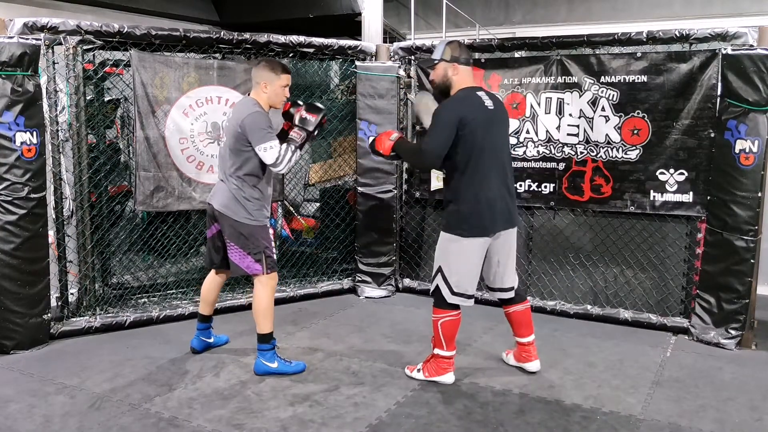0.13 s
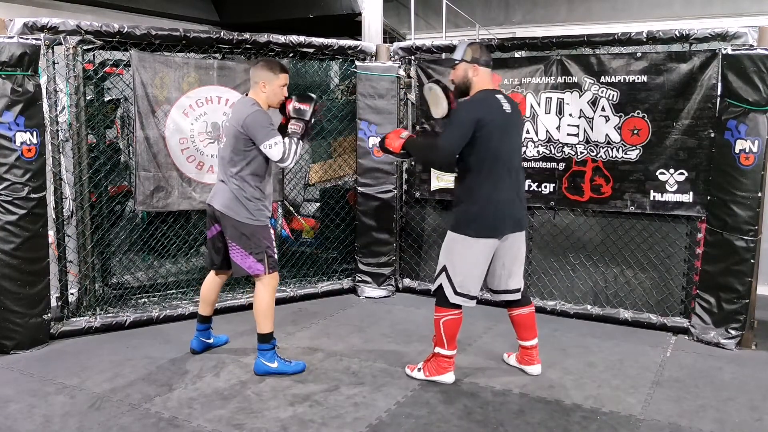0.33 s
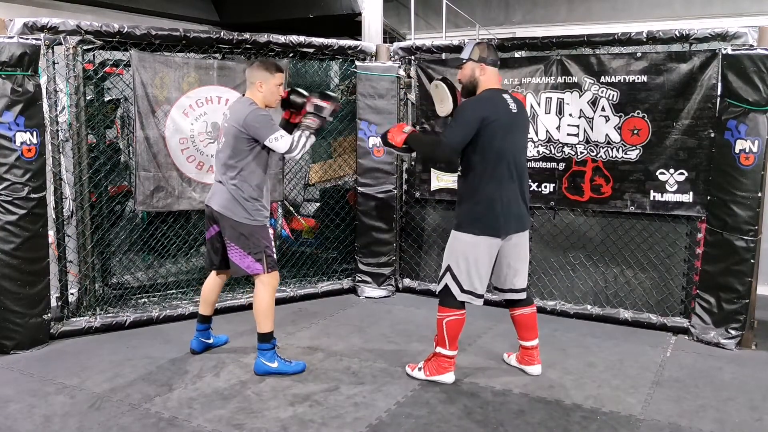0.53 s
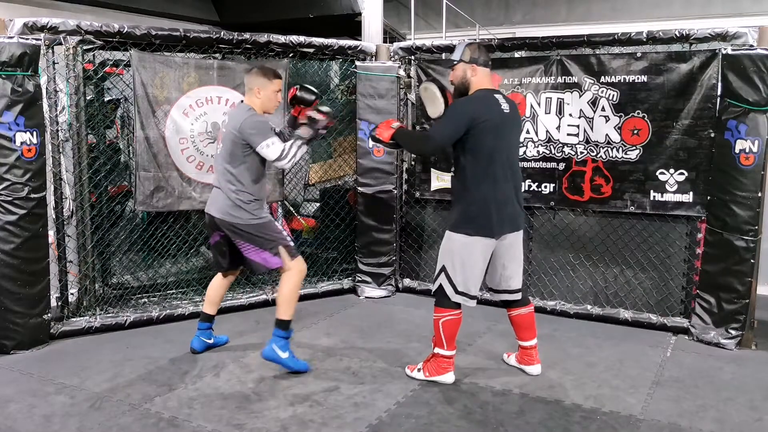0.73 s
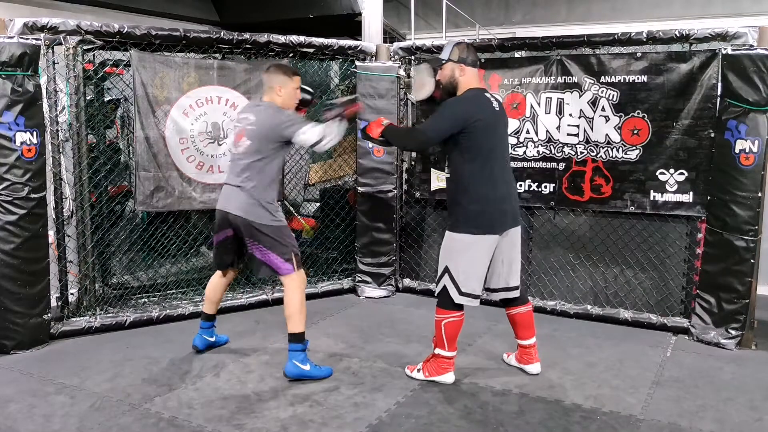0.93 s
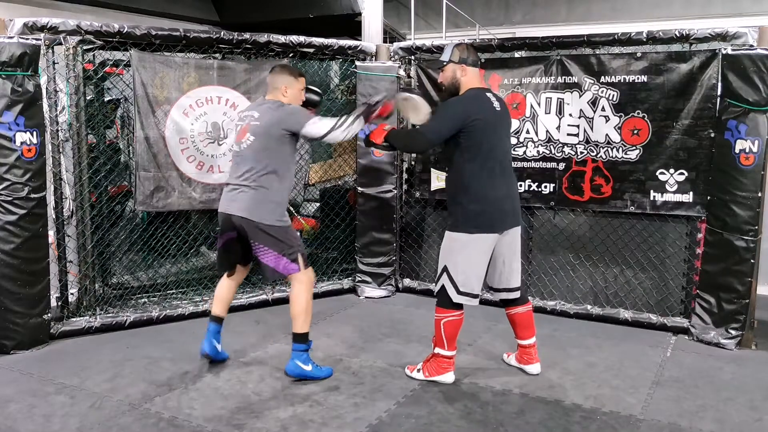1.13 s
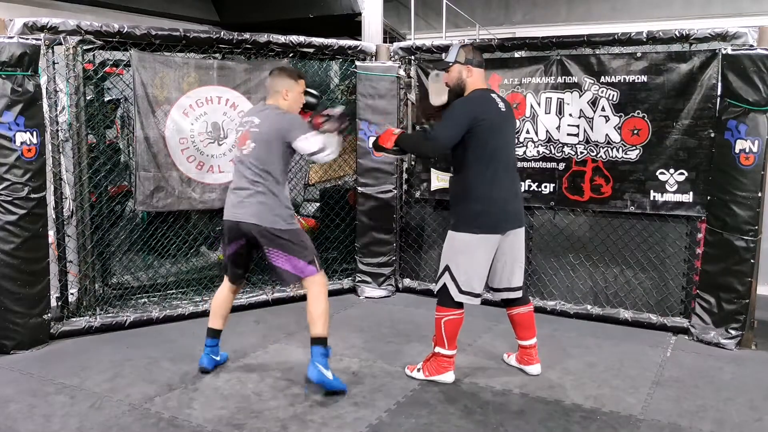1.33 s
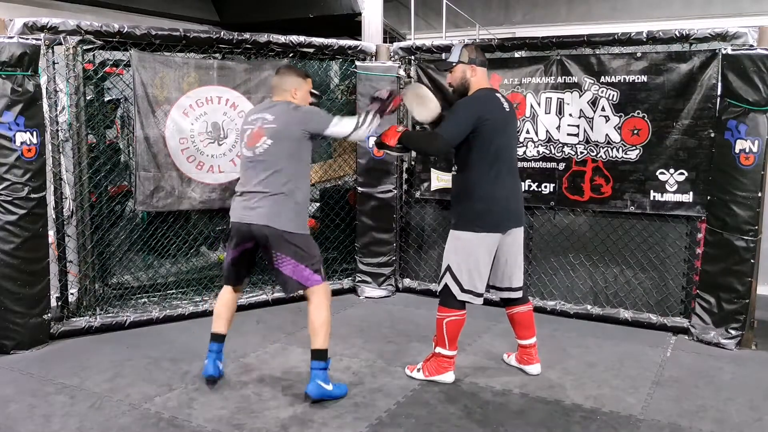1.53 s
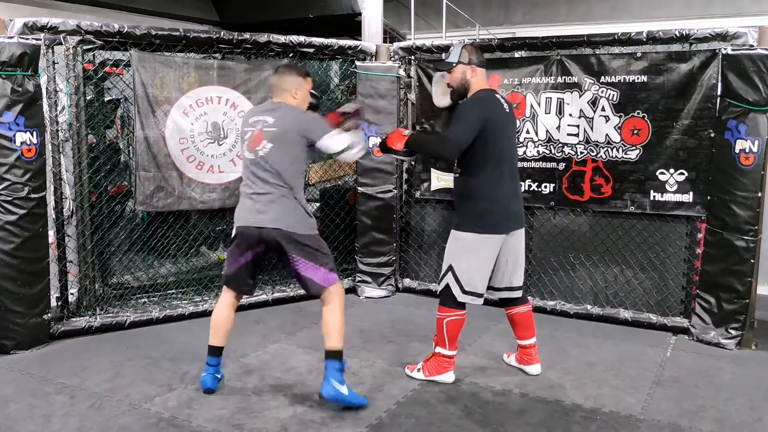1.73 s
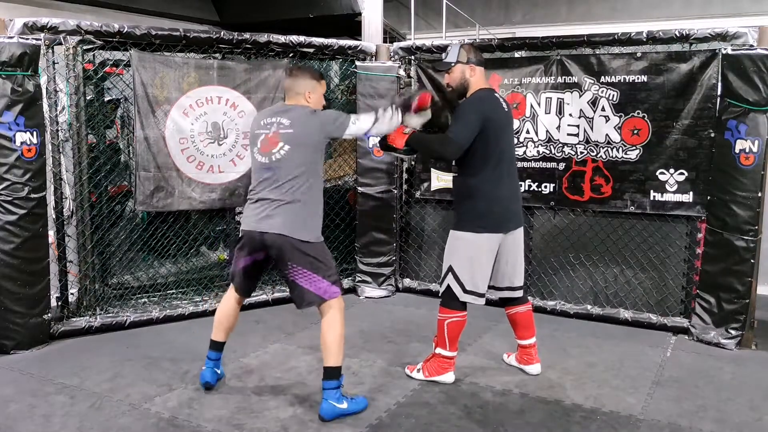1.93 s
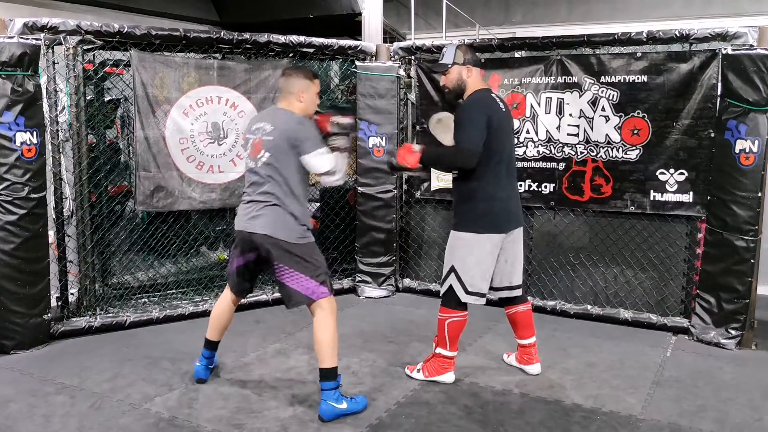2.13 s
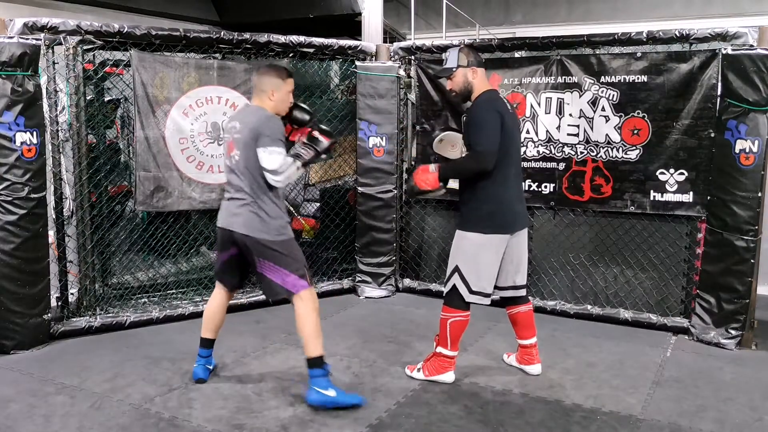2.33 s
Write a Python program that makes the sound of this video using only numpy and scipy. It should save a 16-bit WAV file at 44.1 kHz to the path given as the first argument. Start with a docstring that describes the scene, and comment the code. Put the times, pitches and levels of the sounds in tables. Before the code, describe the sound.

Boxing glove punches on a padded focus mitt: three sharp leather slaps with short hollow thumps at about 0.84, 1.26 and 1.65 seconds, the first weaker. Before them, soft bumps, scuffs and rustles on a mat over faint low rumble and fading tones. Each hit rings through a large, live gym, heard from a few metres. Light footwork at 1.1 and from 1.9 seconds onward, under the dying reverberation.

```python
"""Shoes bump, scuff and rustle on a mat, over a faint steady rumble and faint tones that die away.
Three jabs then land on a padded focus mitt, a few metres away in a large, live gym.
Each is a sharp leather slap (filtered impulse) on a hollow thump of the padding (decaying sines).
Close reflections (delayed copies) and a long, low ring of the hall (decaying noise and sines) follow.
The feet (swells of band-passed noise) move on between the jabs and after the last."""
import sys
import numpy as np
from scipy import signal
from scipy.io import wavfile

SR = 44100
rng = np.random.default_rng(int(sys.argv[2]) if len(sys.argv) > 2 else 0)


def inscribe(sig):
    """Save sig as 16-bit PCM at rate SR to the path in sys.argv[1].

    A 1-D sig is mono; a 2-D sig holds one channel per row.
    Samples are clipped to [-1, 1] before scaling.
    """
    pcm = np.round(np.clip(np.atleast_2d(sig).T, -1, 1) * 32767)
    wavfile.write(sys.argv[1], SR, pcm.astype(np.int16))


N = 109764
T = np.arange(N) / SR  # time [s]
LEFT_RIGHT = np.array([[1], [-1]])  # signs of the two channels
SLOPE_PAN_DB = 4  # bass leans left: this much up on the left, as much down on the right


def from_db(db):
    """Amplitude ratio: a gain of 20 dB is a factor of ten."""
    return 10 ** (np.asarray(db) / 20)


def rms_one(x):
    """Normalisation of mean power: scale to unit rms."""
    return x / np.sqrt(np.mean(x ** 2) + 1e-20)


def at_hz(table, hz):
    """Interpolation on a logarithmic frequency axis: a table's columns at one frequency."""
    f, *columns = np.transpose(table)
    return [np.interp(np.log(hz), np.log(f), c) for c in columns]


def band(x, low, high, order=2):
    """Band limitation by a Butterworth band-pass."""
    sos = signal.butter(order, [low, high], "band", fs=SR, output="sos")
    return signal.sosfilt(sos, x + 1e-18)  # the tiny offset keeps the filter out of denormal numbers


def fade(t, t60):
    """Exponential decay: silence before time zero, then a fall of 60 dB in each t60."""
    return (t >= 0) * from_db(-60 * np.maximum(t, 0) / t60)


def ring(t, modes, pitch=1):
    """Modal superposition: damped sines that start at time zero."""
    out = 0
    for hz, db, t60 in modes:
        out = out + from_db(db) * np.sin(2 * np.pi * hz * pitch * t) * fade(t, t60)
    return out


def convolve(x, response):
    """Linear superposition: pass a mono sound through a stereo impulse response."""
    return signal.fftconvolve(x[None], response, axes=1)[:, :N]


def rub(s, length, low, high):
    """Friction as band-passed noise: a swell that peaks half a length after its start, then dies away."""
    u = np.maximum(T - s, 0) / (length / 2)
    swell = (u * np.exp(1 - u)) ** 2
    return rms_one(band(rng.standard_normal(N), low, high)) * swell


def slap(s, bright_hz):
    """Impulsive contact: a pressure spike of unit peak, its treble falling above a corner frequency."""
    impulse = 1. * (np.arange(N) == int(s * SR))
    spike = signal.lfilter([1], [1, -np.exp(-2 * np.pi * bright_hz / SR)], impulse)
    spike = band(spike, 324, 11600, order=1)
    return spike / spike.max()


def smack(t):
    """Cavity resonance: air trapped in the mitt's palm rings briefly."""
    # modes of the trapped air: (frequency [Hz], level within the smack [dB], t60 [s])
    smack_modes = [(1060, -4, 0.0035), (1674, -10, 0.0054), (2170, -2, 0.0035), (3430, -8.5, 0.0044)]
    return ring(t, smack_modes)


def padding(t, knock_db, pitch, thud_db):
    """Damped modal vibration: the padding knocks and the whole mitt and hand give way."""
    # hollow knock on the padding: (frequency at pitch ratio 1 [Hz], level within the knock [dB], t60 [s])
    pad_modes = [(323, -15.5, 0.013), (432, 6, 0.0093), (738, -2.5, 0.0065), (1020, -3.5, 0.0054)]
    # deep thud of mitt and hand: (frequency [Hz], level within the thud [dB], t60 [s])
    thud_modes = [(55, -11.5, .07), (173, -10.5, 0.03)]
    knock = from_db(knock_db) * ring(t, pad_modes, pitch)
    thud = from_db(thud_db) * ring(t, thud_modes)
    return band(knock + thud, 48.6, 11600)


def crackle(t):
    """Random excitation: leather noise swells into the moment of contact and decays faster after it."""
    t60_s, rise_s = 0.0083, 0.011  # the rise is the time to climb 60 dB
    leather = rms_one(band(rng.standard_normal(N), 1170, 10200))
    return leather * np.maximum(fade(t, t60_s), fade(-t, rise_s))


def jab(s, slap_db, bright_hz, crackle_db, smack_db, knock_db, pitch, thud_db):
    """Impact as a sum of contact spike, trapped air and yielding padding: (blow, leather crackle)."""
    t = T - s
    blow = from_db(slap_db) * slap(s, bright_hz) + from_db(smack_db) * smack(t)
    blow = blow + padding(t, knock_db, pitch, thud_db)
    return -blow, from_db(crackle_db) * crackle(t)


def near_paths():
    """Image sources: the direct sound and its first distinct reflections, which are a little duller."""
    # reflections off floor, ceiling and cage:
    # (delay [s], level before the common echo gain [dB], right ear's lag [s])
    reflections = [(.00205, -4, 0), (.0028, -2, 0), (.0073, -9, .00003), (.0080, -3, .00002),
                   (.0096, -11, -.0002), (.0133, -10, -.0003)]
    echo_db, echo_top_hz = 0.5, 9300
    out = np.zeros((2, N))
    for delay, db, lag in reflections:
        out[0, int(delay * SR)] += from_db(db)
        out[1, int((delay + lag) * SR)] += from_db(db)
    out = from_db(echo_db) * signal.sosfilt(signal.butter(2, echo_top_hz, fs=SR, output="sos"), out)
    out[:, 0] += 1  # direct sound
    return out


def clumps():
    """Uneven reflection density: the scatter's gain wanders at random."""
    spread_db, spacing_s = 3.5, .0012
    steps = np.arange(0, T[-1] + .01, spacing_s)
    return from_db(spread_db * np.interp(T, steps, rng.standard_normal(len(steps))))


def diffuse_bands():
    """Diffuse field: half-octave stereo noise, alike in both ears in the bass, yielded as (Hz, noise)."""
    # difference between the ears: (frequency [Hz], side level relative to mid [dB])
    side_levels = [(60, -5), (110, -8), (200, -11), (380, -9), (700, -4), (1290, 0), (2380, 0), (4400, 0),
                   (8120, 0), (15000, 0)]
    edges = 23.3 * 2 ** np.arange(0, 10, .5)
    white = rng.standard_normal((2, 2, N))  # neighbouring bands use different noise
    for k, (low, high) in enumerate(zip(edges, edges[1:])):
        hz = np.sqrt(low * high)
        mid, side = band(white[k % 2], low, high, order=3)
        width = from_db(at_hz(side_levels, hz)[0])
        stereo = (mid + width * side * LEFT_RIGHT) / np.sqrt(1 + width ** 2)
        lean = from_db(SLOPE_PAN_DB * (hz < 90) * LEFT_RIGHT)  # only the deepest bands lean
        yield hz, lean * stereo


def hall():
    """Statistical reverberation: quick scatter from the cage, a long tail and standing waves."""
    # reverberation: (frequency [Hz], early scatter level [dB], long tail level [dB], tail t60 [s])
    reverberation = [(50, -25.5, 12.5, 0.77), (99, -0.5, -1, 0.78), (160, 1.5, 4, 2.3),
                     (230, -2.5, -4, 2.4), (385, 7, -0.5, 1.46), (720, 5, -4, 1.2), (1440, 5, -4, 0.67),
                     (3060, 8, 1, 0.84), (5160, 6, -6, 0.63), (7200, 9, -4, 0.7), (9900, -0.5, -12, 0.45),
                     (14000, 4.5, -15, 0.86)]
    # standing waves of the hall: (frequency [Hz], level [dB], t60 [s])
    standing_waves = [(46.64, -57, 0.9), (145.1, -57, 0.4), (184.8, -60, 2.0), (282.3, -60.5, 1.5),
                      (310.7, -56.5, 0.77), (436.7, -65.5, 1.8), (547, -72.5, 1.3)]
    scatter_t60_s, scatter_start_s = 0.24, 0.0042
    tail_start_s, tail_build_s = 0.01193, 0.038
    out = ring(T - tail_start_s, standing_waves)
    scatter = rms_one(clumps() * fade(T - scatter_start_s, scatter_t60_s))
    build = 1 - np.exp(-np.maximum(T - tail_start_s, 0) / tail_build_s)
    for hz, noise in diffuse_bands():
        scatter_db, tail_db, t60 = at_hz(reverberation, hz)
        tail = rms_one(build * fade(T, t60))
        envelope = from_db(scatter_db) * scatter + from_db(tail_db) * tail
        out = out + noise * envelope / np.sqrt(N)  # levels state the energy of the response
    return out


def scuffs():
    """Contact and friction: shoes meet the mat with a dull heel knock, a rub of the sole and a hiss."""
    # (time [s], length [s], heel level [dB], sole level [dB], hiss level [dB])
    shoe_contacts = [(0.439, 0.022, -95, -68.5, -77), (0.558, 0.044, -73, -75.5, -74),
                     (0.683, .024, -56, -57, -70), (1.13, 0.026, -61.5, -62, -66.5),
                     (2.058, 0.083, -60, -66.5, -67), (2.182, 0.042, -63, -68, -63.5),
                     (2.34, 0.059, -64, -73.5, -71), (2.418, 0.028, -67, -63, -72)]
    out = 0
    for s, length, heel_db, sole_db, hiss_db in shoe_contacts:
        out = out + from_db(heel_db) * rub(s, length, 262, 484)
        out = out + from_db(sole_db) * rub(s, length, 525, 1607)
        out = out + from_db(hiss_db) * rub(s, length, 2500, 8800)
    return out


def rustles():
    """Friction of fabric: gloves and clothing shift before and between the punches."""
    # (time [s], length [s], level [dB], lower limit [Hz], upper limit [Hz])
    gear_shifts = [(0.163, 0.019, -73.5, 2640, 3400), (1.132, 0.023, -60, 1000, 1900)]
    return sum(from_db(db) * rub(s, length, low, top) for s, length, db, low, top in gear_shifts)


def bumps():
    """Low-frequency impact: weight shifts on the mat, a little to the left."""
    # (time [s], length [s], level before the lean to the left [dB], upper limit [Hz])
    weight_shifts = [(0.104, 0.073, -49, 62), (0.221, 0.076, -54, 59), (0.302, 0.063, -57, 65),
                     (0.424, 0.056, -64, 79), (0.573, 0.035, -53.5, 70), (1.098, 0.014, -41.5, 230),
                     (1.898, 0.0073, -37, 235.8)]
    low = sum(from_db(db) * rub(s, length, 22.2, top_hz) for s, length, db, top_hz in weight_shifts)
    return low * from_db(SLOPE_PAN_DB * LEFT_RIGHT)


def fading_tones():
    """Free decay of narrow-band noise: faint blurred tones in the hall die away from the start."""
    # (centre frequency [Hz], starting level [dB], t60 [s])
    blurred_tones = [(144, -62, 5.7), (335, -66, 2.6), (574, -67, 3.2), (714, -69.5, 1.15)]
    half_width_hz = 20
    out = 0
    for hz, db, t60 in blurred_tones:
        noise = rng.standard_normal(N + SR)
        tone = band(noise, hz - half_width_hz, hz + half_width_hz)[SR:]  # drop the filter's onset
        out = out + from_db(db) * fade(T, t60) * rms_one(tone)
    return out


def air():
    """Stationary noise shaped by its spectral density: steady rumble and faint hiss of the hall."""
    # (frequency [Hz], relative density [dB per Hz])
    density = [(15, -34), (25, -1), (64, -5.5), (114, -33), (229, -16), (344, -23.5), (394, -13.5),
               (516, -34.5), (575, -30), (1440, -32.5), (16000, -48)]
    noise = sum(from_db(at_hz(density, hz)[0]) * noise for hz, noise in diffuse_bands())
    return from_db(-57) * rms_one(noise)


def scene():
    """Superposition of sources; the boxers move, so each blow fills the hall from a new spot."""
    # jabs: (time [s], slap level [dB], slap corner frequency [Hz], leather crackle level [dB],
    #        smack level [dB], knock level [dB], pad pitch [ratio], deep thud level [dB],
    #        gain of direct sound and close reflections [dB])
    punches = [(0.8383, -8, 2944, -29.5, -27.5, -18, 1.0, -15.5, -5),
               (1.2562, 2, 2500, -19, -15, -17, 1, -18.5, -0.5),
               (1.6500, 0, 2200, -25, -21.5, -14.5, 0.98, -30, -2)]
    near, feet = near_paths(), scuffs() + rustles()
    out = feet + bumps() + air() + fading_tones()
    for *row, near_db in punches:
        blow, leather = jab(*row)
        room = hall()
        out = out + convolve(blow, room)
        out = out + from_db(near_db) * convolve(blow + leather, near)
    return out + from_db(-4) * convolve(feet, room)  # the feet share the last blow's room


def record(dry):
    """Saturation and band limitation: the tallest spikes are rounded off and the top treble is cut."""
    ceiling, cutoff_hz = .78, 16000
    rounded = dry / (1 + (dry / ceiling) ** 4) ** .25
    return signal.sosfilt(signal.ellip(12, .1, 100, cutoff_hz, fs=SR, output="sos"), rounded)


dry = scene()
out = record(dry)
inscribe(out)
```